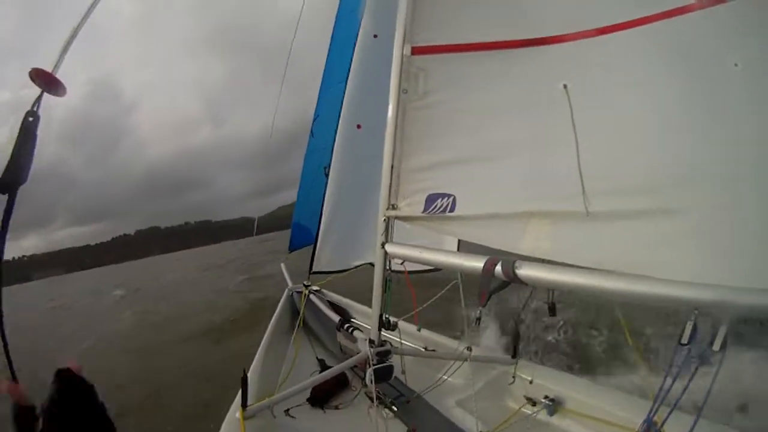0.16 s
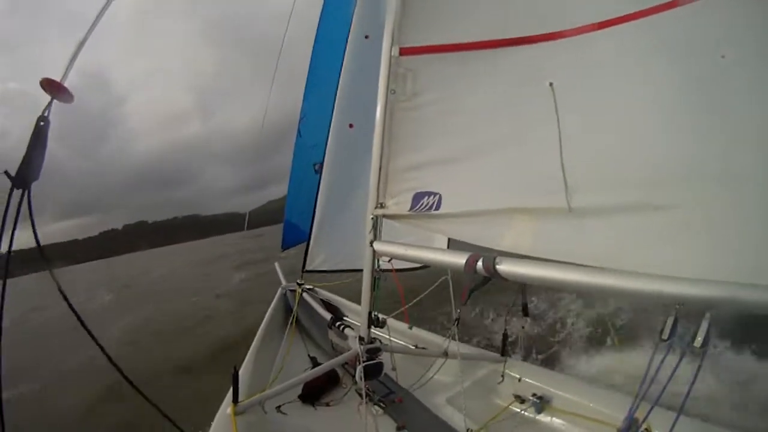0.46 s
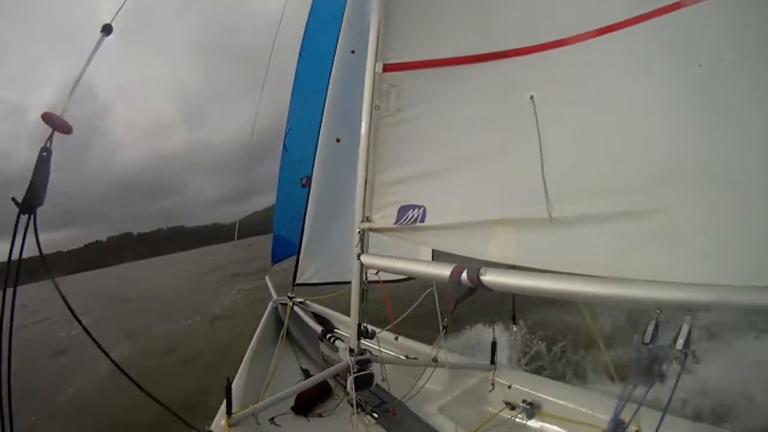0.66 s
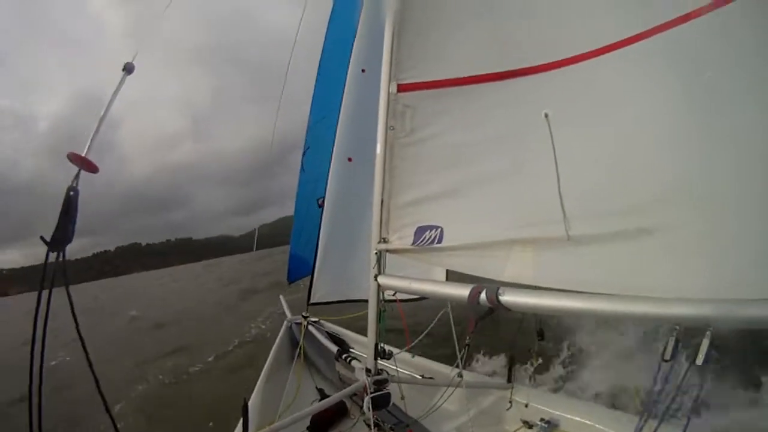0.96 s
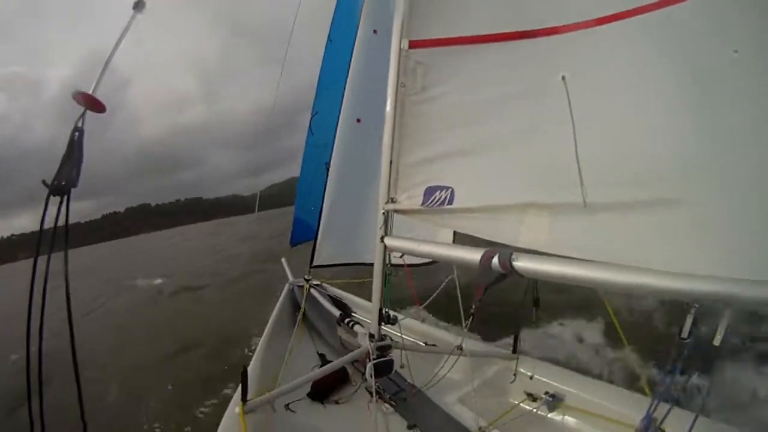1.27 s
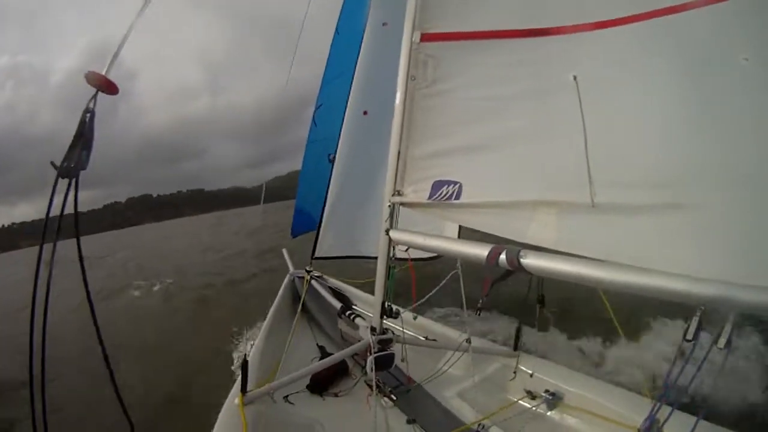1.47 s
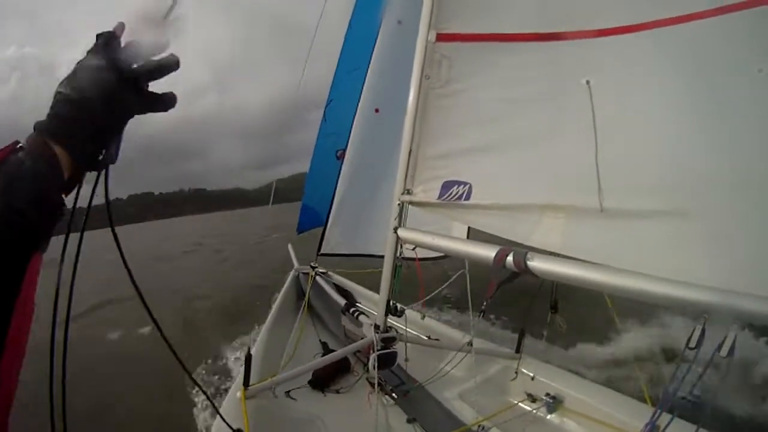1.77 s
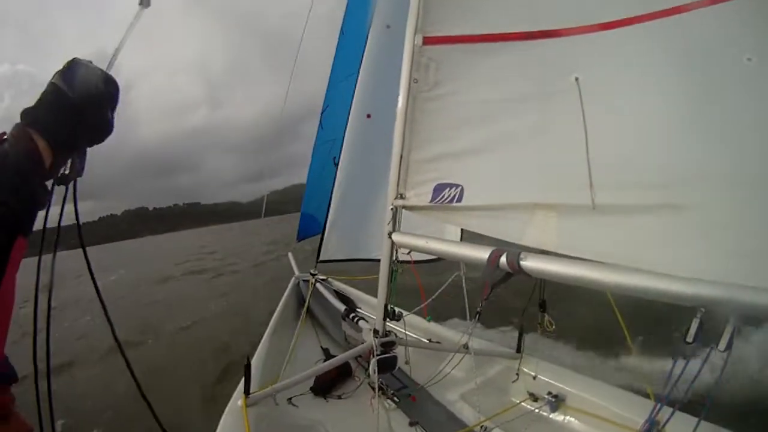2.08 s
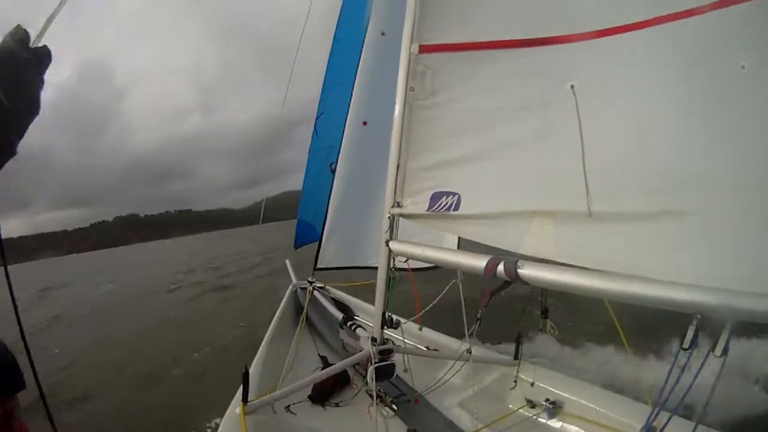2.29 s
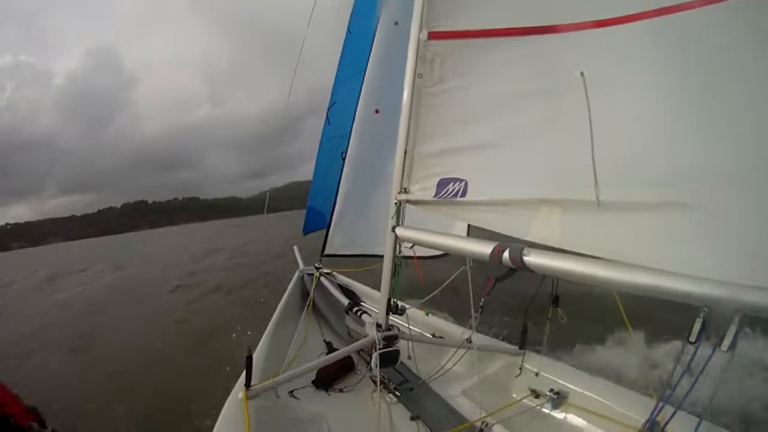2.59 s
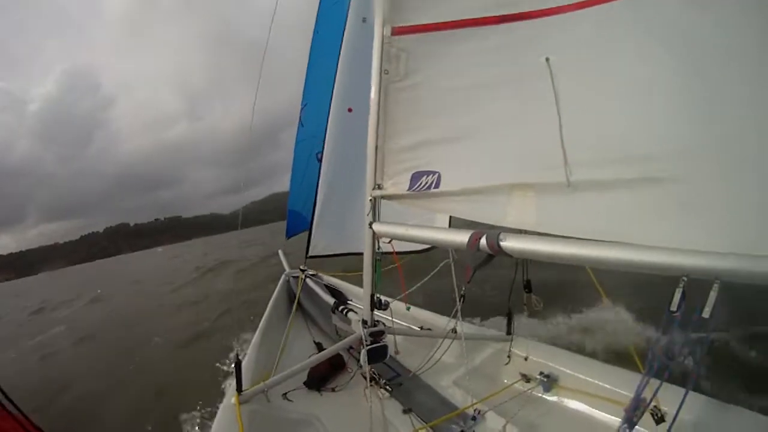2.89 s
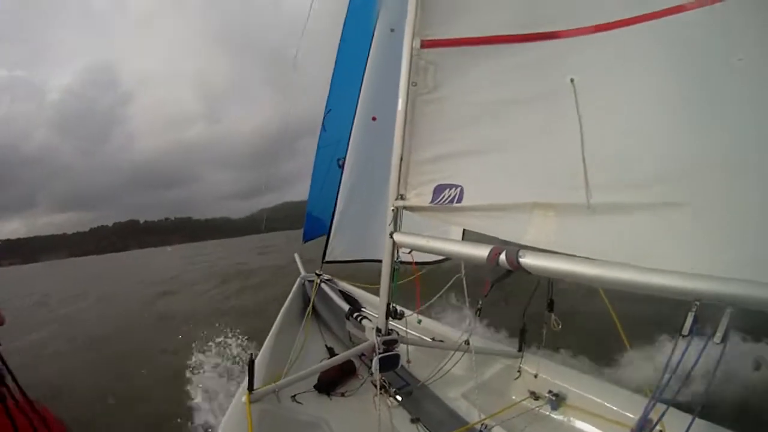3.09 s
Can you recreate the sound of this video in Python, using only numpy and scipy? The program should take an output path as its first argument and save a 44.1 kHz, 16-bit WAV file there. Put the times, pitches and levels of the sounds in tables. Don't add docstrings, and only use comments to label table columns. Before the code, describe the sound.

Steady bright hiss of a bow wave with spray bursts and bubble plips, over faint wind and hull hum; a soft knock comes near the end, all boxy and resonant from an enclosed onboard microphone.

```python
import sys
import numpy as np
from scipy import signal
from scipy.fft import rfft, irfft, next_fast_len
from scipy.io import wavfile
from scipy.ndimage import uniform_filter1d, map_coordinates

SR = 44100
rng = np.random.default_rng(int(sys.argv[2]) if len(sys.argv) > 2 else 0)


def store_pcm(level_fs):
    pcm = np.round(np.clip(level_fs, -1, 1) * 32767).astype(np.int16)
    wavfile.write(sys.argv[1], SR, np.atleast_2d(pcm).T)


def magnitude_from_level(level_db):
    exponent = np.asarray(level_db, float) / 20
    return 10 ** exponent


N = 143325

# time in seconds, level in dB.
BOW_WAVE = [(0, -44.5), (.25, -42.5), (.33, -43.5), (.62, -43), (.72, -43), (.79, -42), (.93, -44.5),
            (.98, -43), (1.2, -44.5), (1.45, -47), (1.8, -45.5), (2.05, -43.5), (2.12, -44.5), (2.4, -45),
            (2.56, -48), (2.67, -45), (2.8, -48), (3.25, -47.5)]
# frequency in Hz, density in dB per Hz.
FOAM_COLOUR = [(20, -62), (200, -43), (600, -40.5), (1500, -25.5), (4000, -13.5), (7000, -18.5),
               (12000, -34.5), (15500, -43)]
# frequency in Hz, density in dB per Hz.
MIST_COLOUR = [(1500, -42), (5000, -5), (8000, 2.5), (11500, -16.5), (15500, -20)]
# start in seconds, length in seconds, level over the mist in dB.
SPRAY_SHEETS = [
    (.13, .07, 4),
    (.6, .07, 5.5),
    (0.75, 0.24, 8),
    (1.14, 0.047, 5.5),
    (1.28, 0.13, 8.5),
    (1.553, 0.15, 5),
    (1.997, 0.38, -6),
    (2.65, .12, -4),
]
# frequency in Hz, density in dB per Hz.
HULL_COLOUR = [(20, -21), (250, -17.5), (650, -13), (800, -5), (1100, -4.5), (1700, -10), (2500, -27.5)]
# frequency in Hz, width in Hz, gain in dB.
CASE_RESONANCES = [(770, 53, 7.5), (1040, 40, 3.5), (1566, 180, 3), (1794, 240, 6), (2370, 280, 10.5),
                   (3170, 500, 13), (4047, 300, 9), (4565, 546, 12.5), (5483, 545, 10.5), (6630, 320, 3.5),
                   (7580, 300, 2.5), (9100, 700, 3), (10230, 850, 4), (11270, 1200, 5.5)]
# frequency in Hz, width in Hz, gain in dB.
CASE_DEAD_SPOTS = [(1000, 48, -5.5), (1580, 78, -8), (2817, 190, -12.5), (3778, 510, -9), (8440, 530, -7),
                   (10770, 210, -7), (12300, 600, -1.5), (3440, 150, -4)]
# frequency in Hz, density in dB per Hz.
BACKGROUND_COLOUR = [(20, 1), (50, -5), (300, -8.5), (1500, -21.5), (8000, -19), (12000, -10), (15500, -11.5)]
# time in seconds, level in dB.
HULL_SLAMS = [(.05, -82), (.7, -82), (.91, -80), (1.25, -84), (2.54, -75), (2.73, -84), (2.81, -77),
              (2.94, -77)]
# start in seconds, peak in dB, pitch in Hz.
LARGE_BUBBLES = [
    (0.2553, -46.5, 1470),
    (0.5472, -72, 1380),
    (0.842, -55, 1430),
    (3.0075, -52, 1280),
    (3.0405, -47.5, 1460),
]
# start in seconds, peak in dB, pitch in Hz.
CLOSE_BUBBLES = [(0.399, -28, 4440), (0.4654, -45, 4600), (0.615, -25.5, 4570), (0.7734, -40, 4460),
                 (0.8018, -24.5, 4440), (0.8659, -28, 4500), (0.9674, -32, 4320), (0.9855, -49, 5600),
                 (1.4724, -32, 4460), (1.8699, -29, 4450), (2.0485, -30, 4500), (2.151, -29, 4420),
                 (2.6334, -34, 4460), (2.6698, -30, 4600), (2.7485, -26.5, 4110), (2.7524, -26, 4260),
                 (2.768, -30, 4620), (2.838, -32, 4490), (3.0069, -32, 4580), (3.1408, -82, 4660),
                 (0.6155, -32, 3300), (0.7721, -31, 3240), (1.6392, -37, 3170), (2.0482, -34.5, 2370),
                    (2.6329, -32.5, 3150), (2.7038, -38, 3000)]
# start in seconds, peak in dB, pitch in Hz.
TRAPPED_WATER = [(.6, -61, 770), (.88, -68, 785), (1.26, -63, 770), (1.53, -59.5, 770), (2.611, -61, 776),
                 (2.65, -63.5, 770), (2.70, -62, 784), (2.884, -59, 764), (2.97, -78, 810)]
# start in seconds, peak in dB, share of dull push from 0 to 1.
RIG_KNOCKS = [
    (2.732, -64.5, .2),
    (2.7725, -48.5, 0.39),
]
# frequency in Hz, level in dB, 60 dB decay in seconds.
WIRE_MODES = [(188, 2, 0.091), (1015, 2.5, 1.5)]
# frequency in Hz, level in dB, 60 dB decay in seconds.
MOUNT_MODES = [(130, -21, .04), (770, 3, 0.055)]
# start in seconds, peak in dB.
DROP_TICKS = [
    (3.0944, -44),
]
# frequency in Hz, density in dB per Hz.
HISS_COLOUR = [(20, -8), (300, -18), (1000, -39), (10000, -24.5), (13000, -15), (15000, -19.5)]


def unit(x):
    return x / np.sqrt(np.mean(x ** 2) + 1e-20)


def along(points, hz):
    f, value = np.transpose(points)
    return np.interp(np.log(hz + 1), np.log(f + 1), value)


def wobble(rate):
    return map_coordinates(rng.standard_normal(1000), [np.arange(N) * rate / SR])


def filtered(x, response):
    m = 2 * next_fast_len(N // 2 + SR // 4)
    return irfft(rfft(x, m) * response(np.fft.rfftfreq(m, 1 / SR)), m)[..., :N]


def causal(db):
    cepstrum = irfft(db * np.log(10) / 20)
    half = len(cepstrum) // 2
    cepstrum[1:half] *= 2
    cepstrum[half + 1:] = 0
    return np.exp(rfft(cepstrum))


def rush(colour, patchy_db):
    grains = signal.stft(rng.standard_normal(N), nperseg=256)[2]
    patches = uniform_filter1d(rng.standard_normal(grains.shape), size=5, axis=0)
    patches = uniform_filter1d(patches, size=5, axis=1)
    noise = signal.istft(grains * magnitude_from_level(patchy_db * unit(patches)), nperseg=256)[1][:N]
    return filtered(noise, lambda hz: magnitude_from_level(along(colour, hz)))


def bubbles(start, db, hz, cycles, rise, size):
    t = np.arange(size) / SR
    age = t * hz[:, None] / cycles
    ring = np.sin(2 * np.pi * hz[:, None] * t * (1 + rise * age))
    wave = magnitude_from_level(db)[:, None] * age * np.exp(1 - age) * ring
    at = np.round(start * SR).astype(int)[:, None] + np.arange(size)
    return np.bincount(at.ravel(), wave.ravel(), N + SR)[:N]


def through_case(x):
    def response(hz):
        modes = CASE_RESONANCES + CASE_DEAD_SPOTS
        return causal(sum(db / (1 + (2 * (hz - c) / width) ** 2) for c, width, db in modes))
    return unit(filtered(x, response))


def follow(wave_db, share):
    return wave_db.mean() + share * (wave_db - wave_db.mean())


def foam(wave_db):
    draw = rng.random((5000, 3))
    start, db, hz = draw[:, 0] * N / SR, 16 * draw[:, 1] ** 3, 1200 * 9 ** draw[:, 2]
    fizz = bubbles(start, db, hz, cycles=2.45, rise=0.031, size=500)
    fizz = filtered(fizz, lambda f: causal(along(FOAM_COLOUR, f)))
    hiss = through_case(rush(FOAM_COLOUR, patchy_db=1.12))
    mix = unit(hiss + magnitude_from_level(-11.5) * through_case(fizz))
    return magnitude_from_level(wave_db + 0.66 * wobble(33.96)) * mix


def mist(wave_db):
    t = np.arange(N) / SR
    rise_s, fall_s = 0.008, 0.023
    sheets_db = np.zeros(N)
    for start, length, db in SPRAY_SHEETS:
        opening = 1 + np.exp((start - t) / rise_s)
        closing = 1 + np.exp((t - start - length) / fall_s)
        sheets_db += db / opening / closing
    level_db = follow(wave_db, share=0.97) - 14.5 + sheets_db + 1.6 * wobble(45)
    return magnitude_from_level(level_db) * through_case(rush(MIST_COLOUR, patchy_db=0.7))


def hull_hum(wave_db):
    level_db = follow(wave_db, share=0.063) - 20 + 1.25 * wobble(7.56)
    return magnitude_from_level(level_db) * through_case(rush(HULL_COLOUR, patchy_db=1.6))


def water():
    wave_db = np.interp(np.arange(N) / SR, *np.transpose(BOW_WAVE))
    return foam(wave_db) + mist(wave_db) + hull_hum(wave_db)


def background():
    return magnitude_from_level(-74.5) * unit(rush(BACKGROUND_COLOUR, patchy_db=1.0))


def slams():
    t = np.arange(N) / SR
    thump_hz, thump_s = 28, 0.028
    thumps = np.zeros(N)
    for start, db in HULL_SLAMS:
        swell = np.exp(-((t - start) / thump_s) ** 2)
        thumps += magnitude_from_level(db) * swell * np.sin(2 * np.pi * thump_hz * (t - start))
    colour = [(10, -24), (25, 9), (33, -2), (45, -28), (200, -54)]  # (Hz, dB)
    rumble = unit(filtered(rng.standard_normal(N), lambda hz: magnitude_from_level(along(colour, hz))))
    return thumps + magnitude_from_level(-88 + 1.4 * wobble(6)) * rumble


def near_bubbles():
    large = bubbles(*np.transpose(LARGE_BUBBLES), cycles=2.6, rise=0.0024, size=1500)
    small = bubbles(*np.transpose(CLOSE_BUBBLES), cycles=4.9, rise=0.00055, size=900)
    gurgles = bubbles(*np.transpose(TRAPPED_WATER), cycles=6.4, rise=0.0014, size=4000)
    return magnitude_from_level(-5) * large + magnitude_from_level(-7) * small + gurgles


def knocks():
    out, t = np.zeros(N + SR), np.arange(SR // 8) / SR
    fade = np.clip((t[-1] - t) / 0.018, 0, 1)
    for (start, db, share), modes in zip(RIG_KNOCKS, (WIRE_MODES, MOUNT_MODES)):
        ring = sum(magnitude_from_level(level - 60 * t / t60) * np.sin(2 * np.pi * hz * t) for hz, level, t60 in modes)
        shiver = magnitude_from_level(3.1 * wobble(60)[:len(t)])
        push = share * np.exp(-t / 0.0012)
        out[round(start * SR):][:len(t)] += magnitude_from_level(db) * (ring * fade * shiver + push)
    return out[:N]


def drop_ticks():
    out, t = np.zeros(N), np.arange(900) / SR
    for start, db in DROP_TICKS:
        attack = 1 - np.exp(-t / 0.0008)
        decay = magnitude_from_level(db + 2 - 60 * t / 0.04)
        out[round(start * SR):][:len(t)] += decay * attack * rng.standard_normal(len(t))
    colour = [(4000, -50), (7500, 2), (10500, -3), (13000, -7), (15000, -8)]  # (Hz, dB)
    return filtered(out, lambda hz: magnitude_from_level(along(colour, hz)))


def scene():
    mono = water() + background() + slams() + near_bubbles() + knocks() + drop_ticks()
    return np.tile(mono, (2, 1))


def band_limit(x):
    return signal.sosfilt(signal.butter(12, 15600, fs=SR, output="sos"), x)


def record(dry):
    bass_cut_hz, top_hz = 120, 15285
    right = filtered(dry[1], lambda hz: 1j * hz / (bass_cut_hz + 1j * hz))
    hiss = unit(filtered(rng.standard_normal(dry.shape), lambda hz: magnitude_from_level(along(HISS_COLOUR, hz))))
    mix = np.array([dry[0], right]) + magnitude_from_level(-81) * hiss
    mix = filtered(mix, lambda hz: hz < top_hz)
    return band_limit(mix)


dry = scene()
out = record(dry)
store_pcm(out)
```